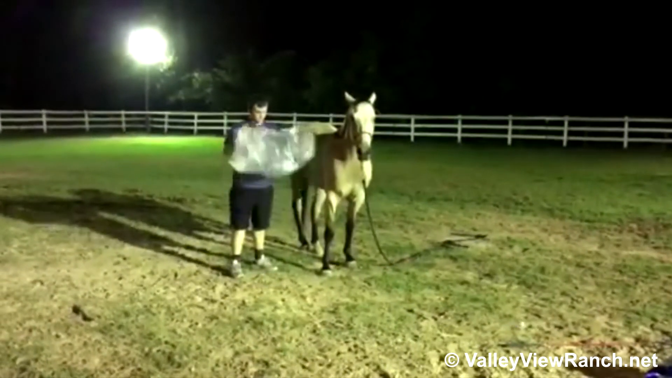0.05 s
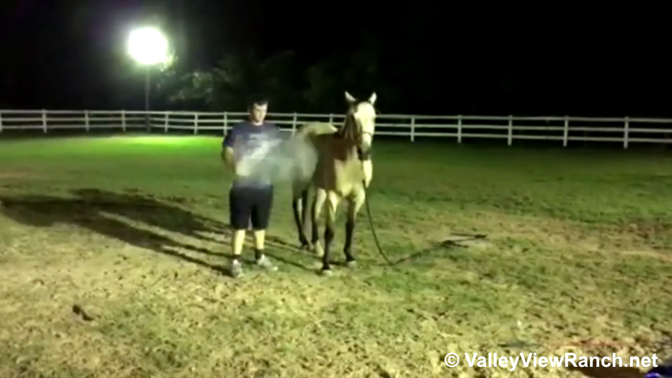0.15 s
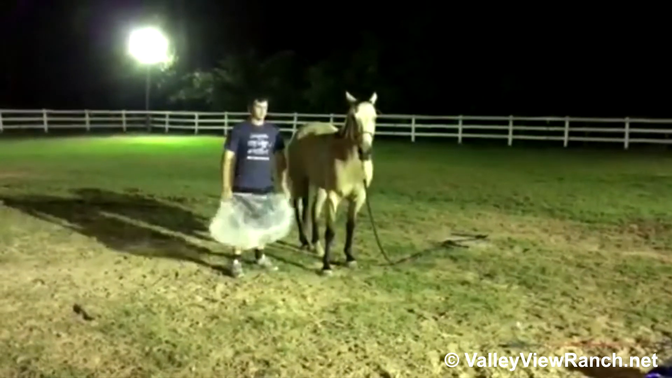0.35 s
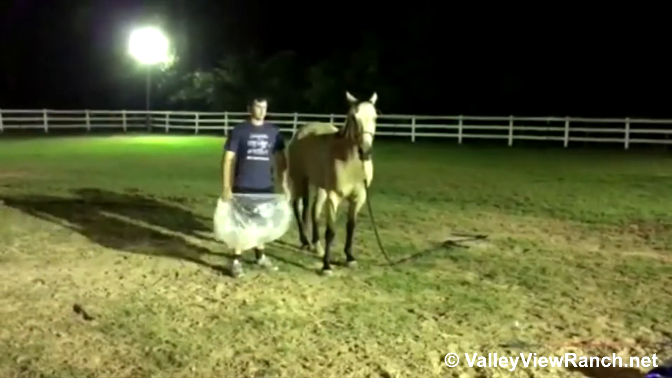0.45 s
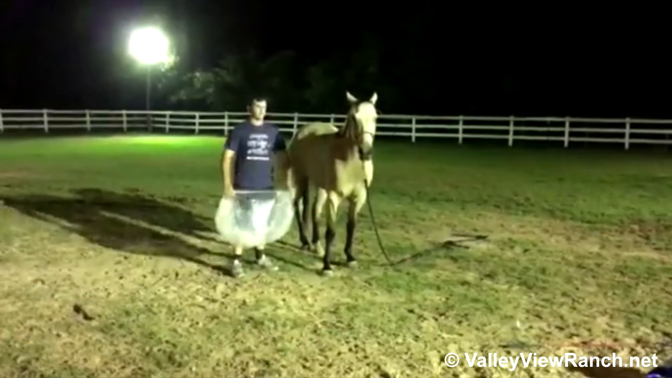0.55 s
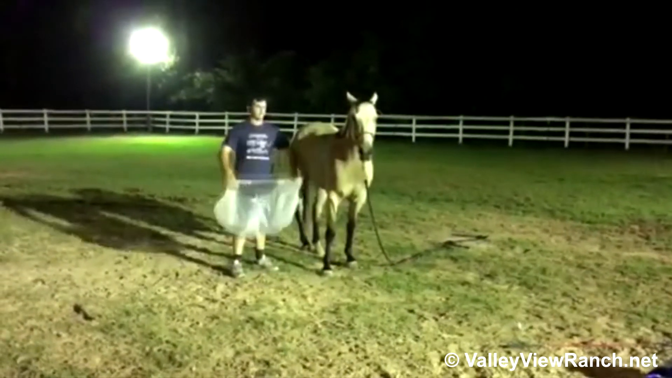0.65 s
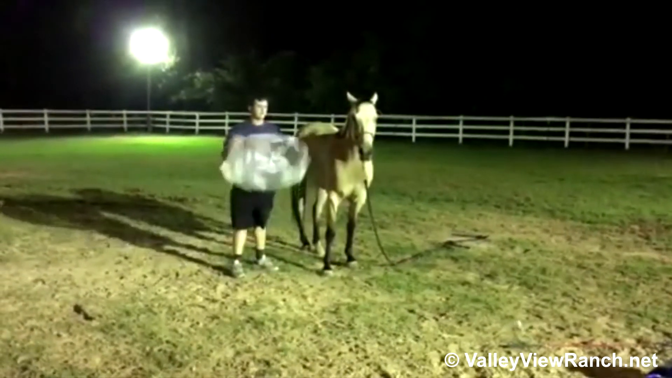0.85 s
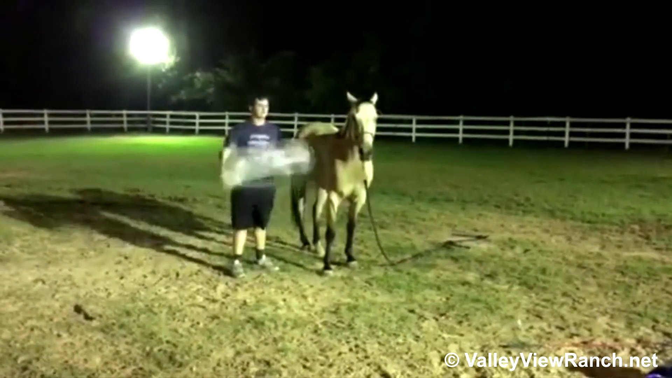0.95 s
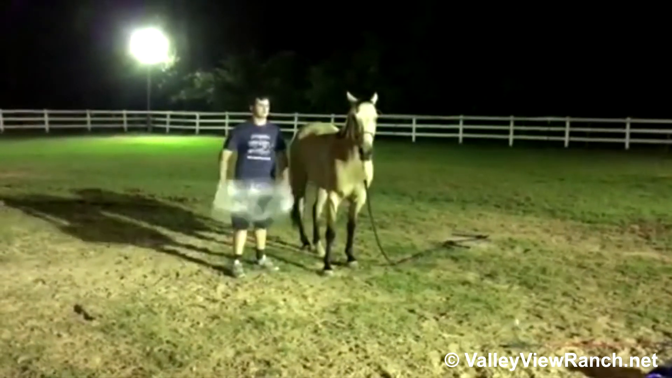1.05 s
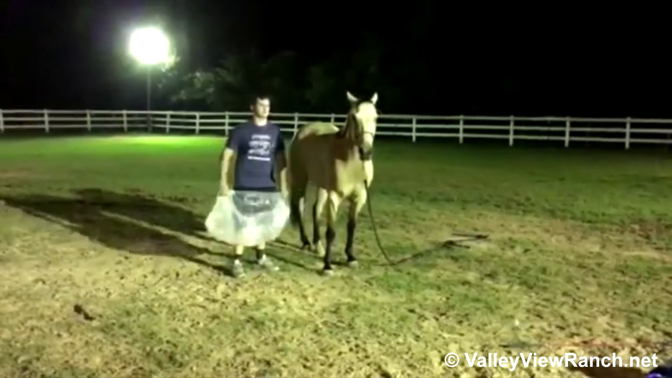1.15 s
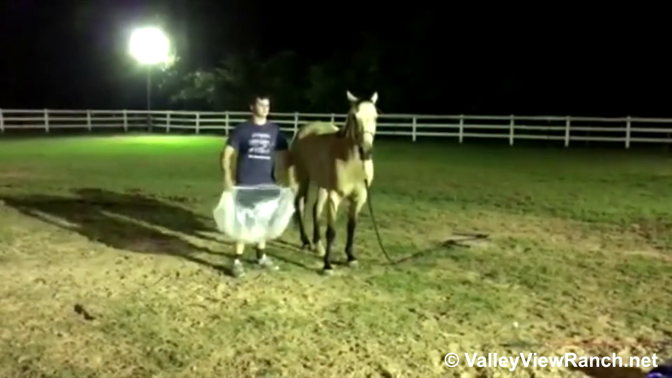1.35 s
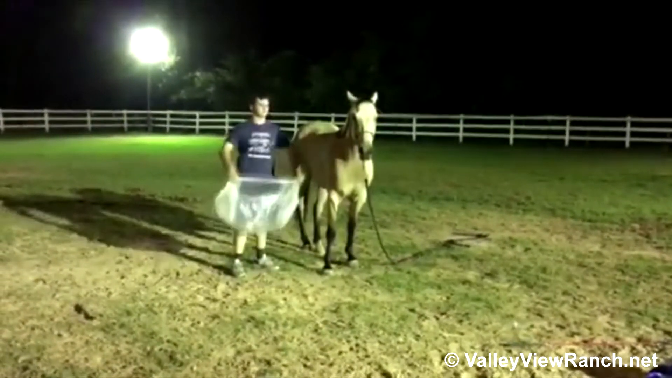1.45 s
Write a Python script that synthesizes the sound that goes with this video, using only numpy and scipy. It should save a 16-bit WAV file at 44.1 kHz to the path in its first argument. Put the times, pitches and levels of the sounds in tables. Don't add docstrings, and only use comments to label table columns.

```python
import sys
import numpy as np
from scipy import signal
from scipy.io import wavfile

SR = 44100
rng = np.random.default_rng(int(sys.argv[2]) if len(sys.argv) > 2 else 0)


def log_audio(samples):
    frames = np.atleast_2d(samples).T
    limited = np.clip(frames, -1, 1)
    pcm = np.round(limited * 32767).astype(np.int16)
    wavfile.write(sys.argv[1], SR, pcm)


def gain_from_decibels(decibels):
    exponent = np.asarray(decibels, float) / 20
    return 10 ** exponent


N = 66150

# (centre [Hz], width [Hz], level [dB], throb [dB])
INSECT_BANDS = [
    (3167, 520, -56.5, 2.5),
    (6490, 800, -61.5, 2),
    (9340, 1200, -63, -0.5),
]
# (frequency [Hz], density [dB per Hz])
AIR_COLOUR = [(200, -3), (420, -3), (800, 3.5), (2000, -3), (5000, -4), (8000, -11.5), (11000, -15),
              (15500, -29)]
# (time [s], level [dB])
BREEZE_LEVEL = [(0, -46.5), (.05, -51.5), (.1, -54), (.16, -43), (.2, -52), (.3, -47), (.38, -45.5),
                (.5, -49), (.58, -47.5), (.66, -50), (.78, -52.5), (.86, -46), (.9, -56), (1.0, -45.5),
                (1.15, -46), (1.24, -48.5), (1.42, -47.5), (1.5, -47.5)]
# (time [s], level [dB], brightness [dB/octave])
RUSTLE_VIGOUR = [(0, -51, -0.5), (.14, -58.5, -1), (.2, -44, -1), (.32, -34, -1), (.38, -38.5, -0.5),
                 (.44, -37.5, -1.5), (.5, -36.5, -1.5), (.54, -45.5, -2.5), (.62, -49.5, -1),
                 (.72, -58, -2.5), (.83, -54, -0.5), (.95, -51.5, -0.5), (1.0, -46.5, 0.0),
                 (1.15, -35.5, -1), (1.23, -39, -0.5), (1.31, -36.5, -1), (1.35, -48.5, -3),
                 (1.5, -55, 0.0)]
# (frequency [Hz], density [dB per Hz])
RUSTLE_COLOUR = [(120, -32), (200, -4), (304, -5.5), (462, -16), (923, -4.5), (1130, -8.5), (1620, -4.5),
                 (11800, -20.5), (15500, -35)]
# (time [s], peak [dB])
TICK_EVENTS = [(0.0104, -44), (0.635, -32.5), (0.7467, -45), (0.7744, -51), (0.8344, -52), (0.846, -40),
               (0.8794, -44), (0.8959, -40), (0.9143, -41), (1.115, -27), (1.2466, -40), (1.266, -29)]
# (delay [s], level [dB])
REFLECTIONS = [
    (.004, -16),
    (.021, -20.5),
    (0.046, -40),
]
# (time [s], peak [dB], centre [Hz], decay t60 [s])
FOLD_SNAPS = [(.15, -41.5, 1000, 0.055), (0.266, -17, 6640, 0.069), (.282, -15.5, 1230, .025),
              (.4, -35, 1510, 0.037), (.47, -24, 1380, 0.024), (.561, -30.5, 1470, 0.056),
              (.641, -34.5, 1300, 0.063), (.752, -38, 1980, 0.02), (.82, -37.5, 1460, 0.078),
              (.88, -38, 5000, 0.034), (.921, -38.5, 2700, 0.044), (.972, -36.5, 880, 0.043),
              (.994, -36, 607, 0.068), (1.0404, -17.5, 2100, 0.049), (1.067, -15, 2920, 0.028),
              (1.18, -30, 1590, 0.063), (1.253, -30, 1300, 0.036), (1.312, -40, 1520, 0.05),
              (1.413, -41.5, 1510, .04)]
# (time [s], level [dB], brightness [dB/octave])
WHIP_VIGOUR = [
    [(.18, -55, 0), (.2, -42, -1.5), (.228, -24, 0.3), (.242, -23.5, -1.4), (.252, -20, -0.7),
     (.27, -17.5, -0.1), (.286, -17.5, 1.2), (.298, -25.5, 2.2), (.312, -33.5, 0.3)],
    [(.99, -51, -.6), (1.03, -32, 0.0), (1.044, -25, -.6), (1.068, -18.5, 0.5), (1.077, -23, -0.5),
     (1.084, -17, 0.0), (1.11, -19, -0.3), (1.12, -27.5, 1.4), (1.14, -34, 0.5)],
]
# (frequency [Hz], density [dB per Hz])
WHIP_COLOUR = [(150, -38), (250, -14), (405, -0.5), (534, -1), (1360, -2), (2320, -4.5), (2570, -4.5),
               (9230, -19), (15500, -27.5)]
# (time [s], peak [dB], frequency [Hz],
# length [cycles], push + or pull - [gain])
THUMPS = [(.236, -24.5, 92, 1.1, 1), (0.2531, -20.5, 436, 3.2, -1.2), (.258, -15.5, 99, 1.66, 0.94),
          (0.2723, -18, 165, 2.07, -0.91), (.283, -20.5, 192, 3, -0.93),
          (0.2843, -10, 1210, 4.9, -0.79), (0.294, -22.5, 189, 2.2, 0.97),
          (0.455, -39, 237, 1.7, -0.88), (0.475, -24, 270, 1.33, -0.88), (1.063, -19, 363, 3, 0.8),
          (1.0693, -11, 138, 1.24, -1.03), (1.083, -18.5, 177, 1.52, 0.73),
          (1.092, -20.5, 117, 1.3, -1.3), (1.108, -20, 185, 1.24, 1), (.306, -25, 80, 0.66, 0.78),
          (1.101, -20, 75, 2.7, -0.59), (1.16, -38.5, 83.5, 2.1, 1), (1.255, -38, 193, 2.9, 1),
          (1.301, -38.5, 293, 3.5, 1), (1.325, -38, 169, 3.1, 0.83), (1.411, -38, 199, 1.2, 0.63)]


def rms_one(x):
    return x / np.sqrt(np.mean(x ** 2) + 1e-20)


def band(x, low_hz, high_hz):
    edges = [low_hz, min(high_hz, .45 * SR)]
    return signal.sosfilt(signal.butter(2, edges, "band", fs=SR, output="sos"), x + 1e-18)


def drift(rate_hz):
    r = np.exp(-2 * np.pi * rate_hz / SR)
    wander = signal.lfilter([1], [1, -2 * r, r * r], rng.standard_normal(N + SR))
    return rms_one(wander[SR:])


def coloured(sources, colour, tilt, patchy_db):
    edges = 170 * 2 ** np.arange(0, 7, .5)
    hz, db = np.transpose(colour)
    centres = np.sqrt(edges[1:] * edges[:-1])
    gains = gain_from_decibels(np.interp(np.log(centres), np.log(hz), db)) * np.sqrt(centres)
    gains /= np.sqrt(np.sum(gains ** 2))
    out = 0
    for k, (gain, centre) in enumerate(zip(gains, centres)):
        flicker = gain_from_decibels(tilt * np.log2(centre / 2000) + patchy_db * drift(37))
        source = sources[k % len(sources)]
        out = out + gain * flicker * rms_one(band(source, edges[k], edges[k + 1]))
    return out


def creases(vigour, colour, per_s, spread_db, clump_db, patchy_db):
    s, db, tilt = np.transpose(vigour)
    t = np.arange(N) / SR
    size_db = spread_db * np.minimum(rng.exponential(1, (3, N)), 5)
    size = gain_from_decibels(size_db) * rng.choice([-1, 1], (3, N))
    clicks = size * (rng.random((3, N)) < per_s / SR)
    sources = clicks[1:] + 0.54 * clicks[0]
    gain = gain_from_decibels(np.interp(t, s, db) + clump_db * drift(68))
    return gain * coloured(sources, colour, np.interp(t, s, tilt), patchy_db)


def burst(s, t60, noise, rise):
    out, start, t = np.zeros(N), int(s * SR), np.arange(len(noise)) / SR
    shape = gain_from_decibels(-60 * t / t60) * (1 - np.exp(-t / rise))
    out[start:start + len(t)] = (noise * shape)[:N - start]
    return out


def insects():
    out = 0
    for hz, width, db, throb_db in INSECT_BANDS:
        level = gain_from_decibels(db + throb_db * drift(19))
        wide = band(rng.standard_normal(N), hz - width, hz + width / 2)
        out = out + level * rms_one(band(wide, hz - width / 2, hz + width / 2))
    return out


def night_air():
    return gain_from_decibels(-52.5) * coloured(rng.standard_normal((2, N)), AIR_COLOUR, 0, patchy_db=1.45)


def breeze_rumble():
    low = band(rng.standard_normal(N + SR), 57, 118)[SR:]
    level_db = np.interp(np.arange(N) / SR, *np.transpose(BREEZE_LEVEL))
    trim_db, lump_db = 0.5, 2.6
    return gain_from_decibels(level_db + trim_db + lump_db * drift(25)) * rms_one(low)


def rustle():
    return creases(RUSTLE_VIGOUR, RUSTLE_COLOUR, per_s=9000, spread_db=3, clump_db=0, patchy_db=2.0)


def ticks():
    t60_s, level_db = 0.0054, 1.5
    out = 0
    for s, db in TICK_EVENTS:
        out = out + gain_from_decibels(db) * burst(s, t60_s, rng.standard_normal(1000), 1 / SR)
    return gain_from_decibels(level_db) * band(out, 8800, 14500)


def echoes(loose):
    return sum(gain_from_decibels(db) * np.pad(loose, (int(s * SR), 0))[:N] for s, db in REFLECTIONS)


def snaps():
    octaves, rise_s = 1.3, 0.00085
    half = 2 ** (octaves / 2)
    out = 0
    for s, db, hz, t60 in FOLD_SNAPS:
        noise = rng.standard_normal(4000)
        fold = band(burst(s, t60, noise, rise_s), hz / half, hz * half)
        out = out + gain_from_decibels(db) * fold / np.abs(fold).max()
    return out


def whips():
    vigour = []
    for whip in WHIP_VIGOUR:
        before = (whip[0][0] - .02, -90, 0)
        after = (whip[-1][0] + .03, -90, 0)
        vigour += [before] + list(whip) + [after]
    return creases(vigour, WHIP_COLOUR, per_s=11000, spread_db=3, clump_db=1.0, patchy_db=0.67)


def thumps():
    t = np.arange(N) / SR
    out = 0
    for s, db, hz, cycles, push in THUMPS:
        swell = np.exp(-(2 * (t - s) * hz / cycles) ** 2)
        out = out + push * gain_from_decibels(db) * np.cos(2 * np.pi * hz * (t - s)) * swell
    return out


def scene():
    loose = snaps() + ticks()
    settling = rustle()
    bag = whips() + settling + thumps() + loose + echoes(loose)
    night = insects() + night_air() + breeze_rumble()
    return (bag + night)[None]


def top_cut(x):
    return signal.sosfilt(signal.butter(12, 15710, fs=SR, output="sos"), x)


def record(dry):
    x = signal.sosfilt(signal.butter(2, 40.4, "high", fs=SR, output="sos"), dry)
    body = signal.sosfiltfilt(signal.cheby2(12, 30, 15350, fs=SR, output="sos"), x)
    top = x - body
    return top_cut(body + gain_from_decibels(-17) * top)


dry = scene()
out = record(dry)
log_audio(out)
```